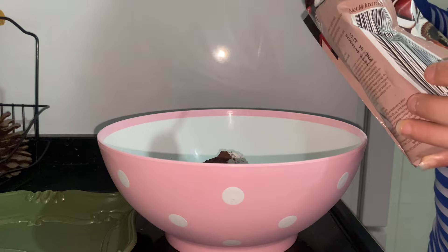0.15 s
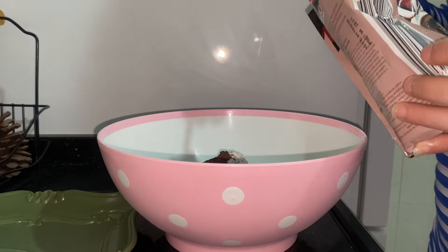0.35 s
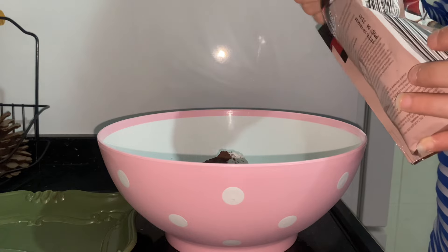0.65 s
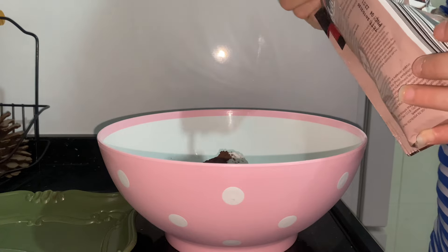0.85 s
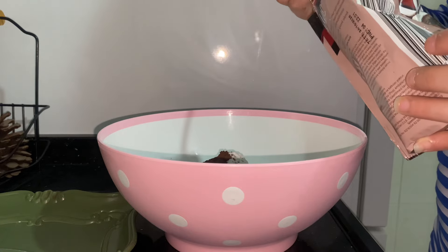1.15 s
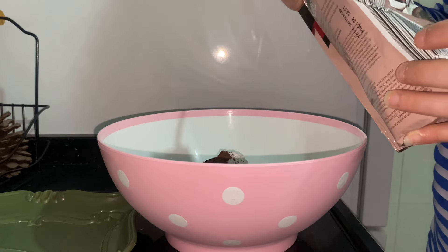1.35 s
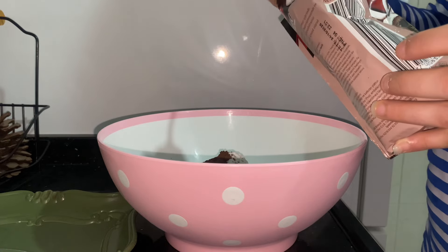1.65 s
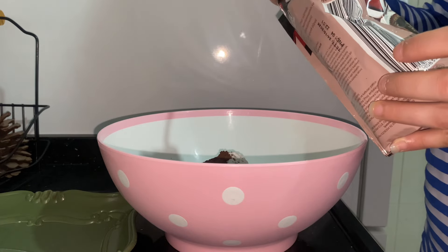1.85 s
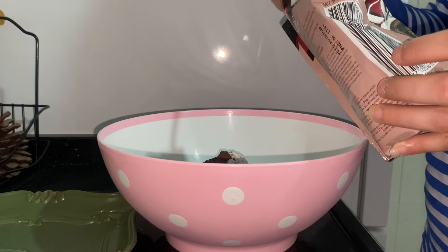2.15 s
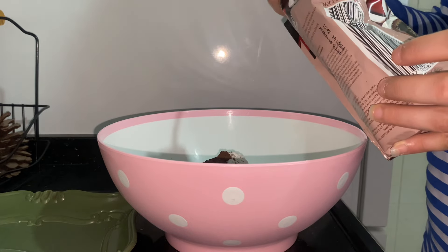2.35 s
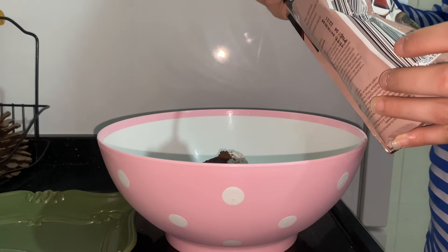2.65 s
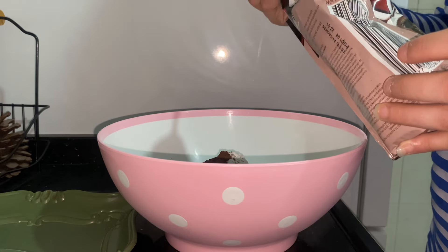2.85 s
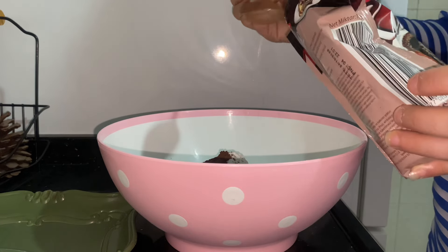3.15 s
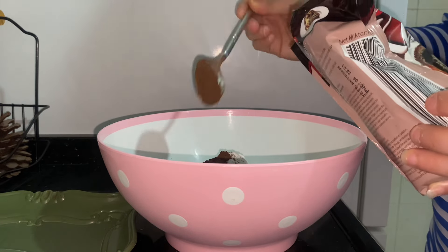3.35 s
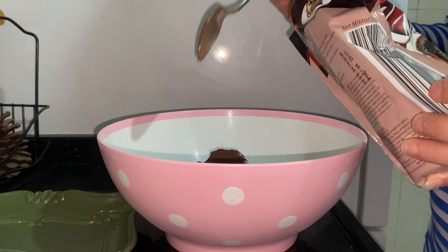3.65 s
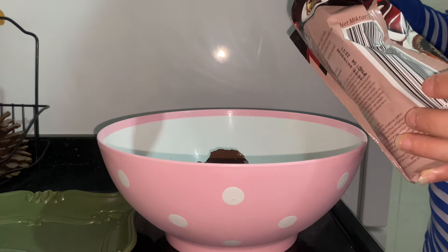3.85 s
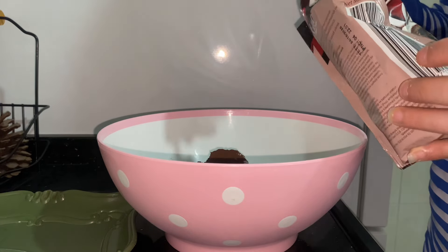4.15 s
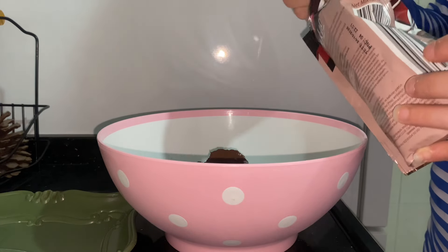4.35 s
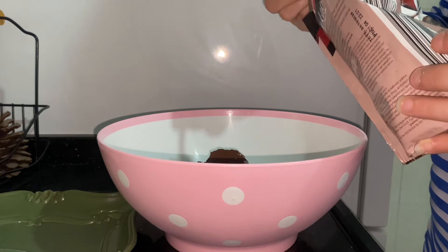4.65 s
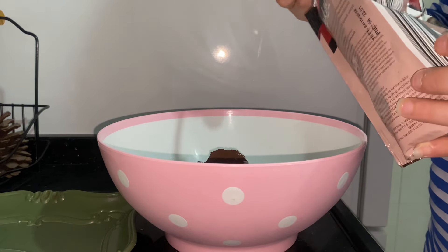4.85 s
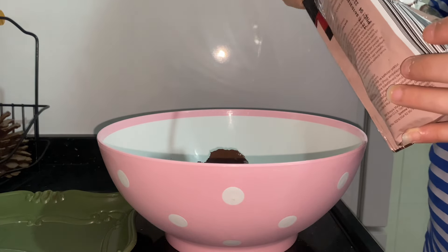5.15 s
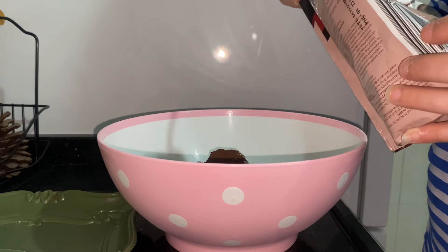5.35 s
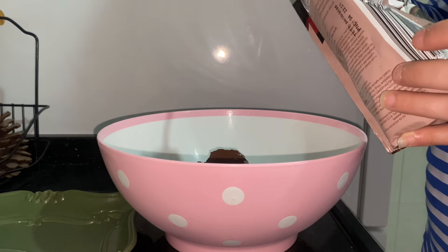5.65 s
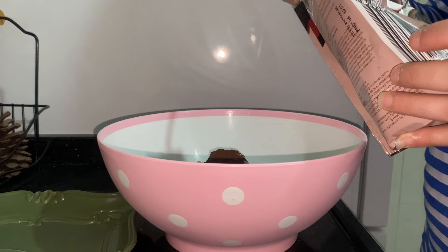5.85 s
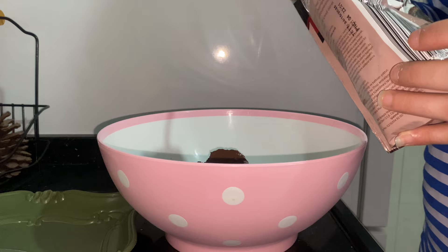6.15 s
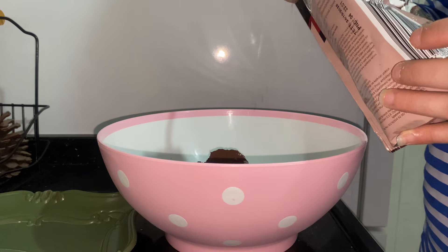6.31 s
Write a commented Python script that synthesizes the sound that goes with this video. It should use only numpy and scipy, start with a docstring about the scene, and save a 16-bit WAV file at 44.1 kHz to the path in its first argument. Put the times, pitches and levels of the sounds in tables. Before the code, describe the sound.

Close, dry crackles and gritty scrapes from a foil-lined packet, broken midway by soft low thumps of powder landing, in a quiet kitchen.

```python
"""In a quiet kitchen a deep drone and a low rumble swell and fade, with room tone and a faint hum throughout.
A spoon digs in a paper and foil packet of powder, held close over a plastic bowl: each stroke is
stick-slip friction, and the buckling packet walls snap as struck resonators, with the bowl ringing along.
Halfway through, clumps of powder land in soft thuds made of a bump and a decaying low tone, with a patter
of grains; then the digging goes on."""
import sys
import numpy as np
from scipy import signal
from scipy.fft import rfft, irfft
from scipy.io import wavfile

SR = 44100
rng = np.random.default_rng(int(sys.argv[2]) if len(sys.argv) > 2 else 0)


def to_wav(s):
    """Save 16-bit WAV."""
    ch = np.atleast_2d(s).T  # columns
    pcm = np.round(np.clip(ch, -1, 1) * 32767)  # PCM
    wavfile.write(sys.argv[1], SR, pcm.astype(np.int16))


N = 285768
TIME = np.arange(N) / SR  # s

# Level of the deep drone. Each row: time in seconds, relative level in dB.
DRONE_CURVE = [(0.0, -48.5), (0.28, -40), (0.36, -48), (1.12, -39), (1.85, -54.5), (2.91, -54), (3.3, -46),
               (4.94, -70), (6.4, -63.5)]
# Level of the low rumble. Each row: time in seconds, relative level in dB.
RUMBLE_CURVE = [(0.0, -55), (0.58, -54), (2.71, -56), (3.18, -48.5), (3.57, -55.5), (3.81, -49),
                (4.33, -55), (5.63, -61), (6.48, -59)]
# Spectrum of the low rumble. Each row: frequency in Hz, relative density in dB per Hz.
RUMBLE_SPECTRUM = [(28, -10.5), (60, -1.5), (85, 3), (130, -5.5), (190, -19.5)]
# Spectrum of the room tone. Each row: frequency in Hz, relative density in dB per Hz.
ROOM_TONE_SPECTRUM = [(100, -11.5), (200, -18), (320, -10.5), (450, -16.5), (800, -23.5), (1200, -25),
                      (1700, -33), (2400, -40), (4000, -44.5), (8000, -54.5), (11000, -51.5),
                      (16000, -69.5)]
# Times when the spoon is inside the packet. Each row: start in seconds, end in seconds.
DIG_SPANS = [(0.132, 3.054), (4.003, 5.275), (5.41, 6.48)]
# Spoon strokes. Each row: start in seconds, push in seconds, easing off in seconds,
# relative level of the scrape through the powder in dB, level of the hiss along the lining in dB.
SPOON_STROKES = [(0.132, 0.0052, 0.03, -55, -45.5), (0.163, 0.058, 0.059, -47, -46),
                 (0.294, .03, .1, -42, -47.5), (0.43, 0.039, 0.042, -50.5, -53),
                 (0.556, .18, .08, -41.5, -52), (0.79, 0.16, 0.066, -45, -54.5),
                 (1.035, 0.057, 0.072, -63, -60.5), (1.11, .073, 0.11, -56, -50),
                 (1.285, 0.065, 0.051, -53, -49), (1.439, 0.032, 0.07, -57.5, -53.5),
                 (1.54, 0.038, 0.11, -59.5, -57), (1.609, 0.039, 0.099, -56, -54.5),
                 (1.682, 0.046, .045, -53, -50), (1.779, 0.051, 0.088, -51, -47),
                 (1.87, 0.028, 0.044, -57, -50.5), (2, 0.0062, 0.059, -45, -44.5),
                 (2.025, 0.042, 0.037, -54, -49.5), (2.171, 0.014, 0.052, -46, -45),
                 (2.208, 0.031, .035, -51, -49.5), (2.322, 0.011, 0.14, -45.5, -45),
                 (2.475, 0.034, 0.047, -44, -44.5), (2.605, 0.039, 0.088, -54.5, -58),
                 (2.715, 0.055, 0.15, -46, -51), (2.91, 0.064, 0.025, -40, -46.5),
                 (4.0, 0.023, 0.025, -59, -61.5), (4.08, 0.051, 0.055, -65, -61.5),
                 (4.204, 0.0054, 0.086, -46, -50.5), (4.285, 0.057, 0.15, -48.5, -56),
                 (4.41, .053, 0.038, -37.5, -44), (4.485, 0.056, 0.37, -59, -62),
                 (4.733, 0.031, 0.042, -37.5, -50), (4.9, 0.036, 0.15, -55, -54.5),
                 (5.0, 0.11, 0.18, -52.5, -49), (5.41, .025, .035, -66, -65),
                 (5.467, 0.047, 0.056, -58, -53.5), (5.6, 0.021, 0.069, -54, -47.5),
                 (5.65, 0.045, 0.022, -54.5, -47.5), (5.775, 0.057, 0.13, -56.5, -56.5),
                 (5.955, 0.011, 0.046, -55, -47), (6.0, 0.019, 0.07, -63, -53),
                 (6.113, 0.018, 0.12, -47.5, -47), (6.282, 0.011, 0.17, -48.5, -48),
                 (6.425, 0.061, .05, -44, -46)]
# Spectrum of the scrape through powder. Each row: frequency in Hz, relative density in dB per Hz.
SCRAPE_SPECTRUM = [(200, -2.5), (300, 0), (420, 0), (560, -5.5), (700, 3), (820, -11), (950, 3), (1300, -6),
                   (1900, -3.5), (2500, -7), (3200, -6), (4300, -16), (6000, -19)]
# Spectrum of the hiss along the lining. Each row: frequency in Hz, relative density in dB per Hz.
HISS_SPECTRUM = [(900, -8.5), (1300, -5), (2000, -1), (2500, -10.5), (3200, -8), (4200, -5.5), (5200, -5),
                 (8000, -5), (9700, 3.5), (10800, 0), (12000, 0), (13500, -1.5), (14500, -13),
                 (16000, -7.5)]
# Buckles of the packet wall. Each row: time in seconds, panel pitch in Hz, panel level in dB,
# brightness of the foil's crack in dB above the panel, level of the thump of air in dB.
WALL_BUCKLES = [(0.1351, 1300, -37, -7.5, -38), (0.153, 1300, -44, -2, -47),
                (0.318, 1540, -34, -12.5, -39.5), (0.3369, 1150, -37, -1, -44),
                (0.4407, 2240, -45.5, -9, -54), (0.457, 2260, -34.5, -17, -52), (0.4732, 1470, -47, 1, -48),
                (0.6167, 1500, -47, -8, -36.5), (0.6666, 1220, -42.5, -19, -42),
                (0.7079, 1740, -39, -3.5, -41.5), (0.7319, 1000, -46, 2.5, -43),
                (0.7428, 1380, -37.5, -18, -44), (0.975, 1190, -57, -4, -37.5),
                (1.27, 1300, -39.5, -33, -36.5), (1.3761, 1770, -41.5, 2, -51),
                (1.489, 1150, -47.5, -21, -46.5), (2.004, 1192, -57, 9, -64), (2.1787, 1022, -49, 2, -49),
                (2.2321, 1240, -45.5, -3.5, -64), (2.3554, 1756, -34.5, 2.5, -55),
                (2.381, 2110, -27.5, 2.5, -64.5), (2.4322, 1240, -32, -11.5, -54),
                (2.482, 1757, -43.5, 4.5, -58), (2.5086, 1910, -29.5, 0.5, -47),
                (2.774, 1840, -35.5, -1.5, -54), (2.8527, 1760, -44, -6.5, -50),
                (2.9691, 1560, -38, -5.5, -50.5), (3.0408, 1550, -53.5, -22, -59.5),
                (4.0628, 1670, -41.5, -2.5, -39), (4.072, 1640, -42.5, -5.5, -46),
                (4.2084, 1700, -33.5, -5, -38.5), (4.2318, 1930, -25.5, -7, -35),
                (4.2323, 3290, -31.5, -13.5, -40.5), (4.3461, 1880, -35, -0.5, -47),
                (4.461, 2240, -34, -.5, -48), (4.4674, 1640, -41, -17, -40.5), (4.7553, 1580, -29, -7, -35),
                (4.7828, 1210, -30, -16, -33), (4.8086, 1880, -43.5, 3.5, -47),
                (4.9402, 1060, -49, -6.5, -67), (5.0067, 1820, -48.5, 1, -56), (5.6104, 1950, -53, 0, -45),
                (5.8237, 1200, -52, 1, -57), (5.9649, 1950, -49.5, 4, -50), (6.125, 2060, -47, 2.5, -50.5),
                (6.1521, 1900, -30.5, 2.5, -48), (6.3188, 1900, -29, 3.5, -62),
                (6.354, 1350, -29, 7, -50.5)]
# Bowl resonances set off by sound nearby. Each row: frequency in Hz, relative level in dB,
# decay time by 60 dB in seconds.
BOWL_MODES = [(650, -15.5, 0.19), (1253, -2, 0.13), (1510, -16, 0.3), (1714, -10, 0.046), (3000, -10, .1)]
# Phase by which the left port leads for sound from the packet. Each row: frequency in Hz, phase in radians.
PORT_LEAD = [(400, 0), (850, 1.7), (1800, -.4), (2400, 0), (2850, 1.7), (3900, .1), (5400, 1.8),
             (7700, -.3), (9100, -3.1), (10500, -6), (11700, -6.5), (13300, -9.4), (14600, -12.4),
             (16000, -12.7)]
# Level by which the left port exceeds the right for packet sound. Each row: frequency in Hz, excess in dB.
PORT_EXCESS = [(300, -4), (650, -1.5), (1200, 1), (2200, 3), (5000, 2.3), (11000, 0)]
# Reverberation of the kitchen. Each row: frequency in Hz, decay time by 60 dB in seconds.
KITCHEN_DECAY = [(150, .35), (1000, 0.4), (4000, 0.24), (14000, .15)]
# Loose powder pattering down around the landing clumps. Each row: start in seconds, swell in seconds,
# dying away in seconds, level in dB.
POWDER_SPILLS = [(3.157, 0.026, 0.12, -32.5), (3.34, .04, 0.089, -61.5), (3.605, 0.045, 0.08, -47),
                 (3.725, 0.021, 0.12, -46.5)]
# Clumps of powder landing. Each row: time in seconds, peak level in dB, pitch in Hz.
POWDER_CLUMPS = [(3.169, -29, 97.7), (3.194, -21.5, 79.2), (3.212, -24.5, 77.4), (3.241, -26.5, 99.2),
                 (3.308, -34, 58.7), (3.346, -36.5, 50.2), (3.636, -31, 91.2), (3.665, -32, 93.2),
                 (3.753, -33.5, 80), (3.83, -35.5, 133), (3.867, -37.5, 128)]
# Spectrum of a clump's bump. Each row: frequency in Hz, relative density in dB per Hz.
THUD_SPECTRUM = [(30, -13.5), (55, 2), (95, 2), (135, -3), (180, -22), (260, -31)]
# Spectrum of the pattering powder. Each row: frequency in Hz, relative density in dB per Hz.
PATTER_SPECTRUM = [(140, 1.5), (190, -16), (240, -5), (300, 2.5), (345, -2), (410, -3.5), (480, -3),
                   (560, -30), (700, -20), (850, -33), (1350, -32), (2500, -55.5)]


def from_db(db):
    """Decibel law: a level difference as an amplitude ratio."""
    return 10 ** (np.asarray(db) / 20)


def rms_one(x):
    """Normalisation of effective value: scaled to rms 1."""
    return x / np.sqrt(np.mean(x ** 2) + 1e-20)


def at_hz(points, hz):
    """Interpolation of a table on a logarithmic frequency axis."""
    table_hz, value = np.transpose(points)
    return np.interp(np.log(np.maximum(hz, 1)), np.log(table_hz), value)


def band(x, low_hz, high_hz, order=2):
    """Causal band-pass filtering with a maximally flat passband."""
    edges_hz = [low_hz, min(high_hz, .45 * SR)]
    return signal.sosfilt(signal.butter(order, edges_hz, "band", fs=SR, output="sos"), x + 1e-18)


def colour(x, spectrum, size=8192):
    """Minimum-phase filtering, by the folded cepstrum, to a spectrum with steep skirts; rms 1."""
    hz = np.maximum(np.fft.rfftfreq(size, 1 / SR), 1)
    low_skirt = 1 + (spectrum[0][0] / hz / 1.2) ** 6
    high_skirt = 1 + (hz / spectrum[-1][0] / 1.2) ** 6
    gain = from_db(at_hz(spectrum, hz)) / np.sqrt(low_skirt * high_skirt)
    cepstrum = irfft(np.log(gain + 1e-6))
    cepstrum[size // 2:] = 0
    response = irfft(np.exp(rfft(2 * cepstrum)))
    return rms_one(signal.fftconvolve(np.atleast_2d(x), response[None])[:, :N])


def drift(rate):
    """Slow random modulation: chance values of spread 1, `rate` per second, joined by straight lines."""
    knots = rng.standard_normal(N // 20)
    return np.interp(TIME * rate, np.arange(len(knots)), knots)


def resonance(x, hz, width_hz):
    """Damped oscillation: a two-pole resonator with gain 1 at its peak."""
    r = np.exp(-np.pi * width_hz / SR)
    zeros = np.array([1, 0, -1]) * (1 - r * r) / 2
    poles = [1, -2 * r * np.cos(2 * np.pi * hz / SR), r * r]
    return signal.lfilter(zeros, poles, x + 1e-18)


def wide_noise(side_db):
    """Partial coherence: stereo white noise with a part of opposite sign in the two channels."""
    mid, side = rng.standard_normal((2, N))
    return mid + from_db(side_db) * side * [[1], [-1]]


def level(rows):
    """Amplitude envelope: a curve of time and dB as a gain."""
    return from_db(np.interp(TIME, *np.transpose(rows)))


def wavering_tone(hz, phase_waver, phase_rate, level_waver_db, level_rate):
    """Phase and amplitude modulation: a sine whose phase and level drift; rms 1."""
    tone = np.sin(2 * np.pi * hz * TIME + phase_waver * drift(phase_rate))
    return rms_one(tone * from_db(level_waver_db * drift(level_rate)))


def background(drone_db=1.5, rumble_db=4.0, room_tone_db=-60.5, hum_db=-67, pan_db=-0.34):
    """Superposition: a deep drone and low rumble that swell and fade, room tone, wavering appliance hum."""
    drone = level(DRONE_CURVE) * from_db(drone_db) * wavering_tone(46.1, 0.97, 9.9, 2.2, 24)
    rumble_noise = colour(wide_noise(side_db=-16.5), RUMBLE_SPECTRUM)
    rumble = level(RUMBLE_CURVE) * from_db(rumble_db) * rumble_noise
    room_tone = from_db(room_tone_db) * colour(wide_noise(side_db=1.5), ROOM_TONE_SPECTRUM)
    hum = from_db(hum_db) * wavering_tone(296.3, 0.8, 7.7, 1.3, 9)
    return (drone + rumble + room_tone + hum) * from_db([[pan_db], [-pan_db]])


def swell(start_s, rise_s, fall_s, depth_db=19.5, roundness=1.46):
    """Envelope of one gesture: the gain builds up to 1 and eases off along a rounded slope in dB."""
    late = TIME - start_s - rise_s
    away = np.clip(np.maximum(-late / rise_s, late / fall_s), 0, 5)
    return from_db(-depth_db * away ** roundness)


def pressure(rub_scrape_db=-64, rub_hiss_db=-73.5, uneven_db=2.0, withdraw_db_per_s=142):
    """Friction grows with contact force: light uneven rubbing on powder and lining, strokes on top."""
    inside = sum((TIME > start) * from_db(-withdraw_db_per_s * np.maximum(TIME - end, 0))
                 for start, end in DIG_SPANS)
    rub = from_db(uneven_db * drift(14))
    scrape, hiss = from_db(rub_scrape_db) * rub, from_db(rub_hiss_db) * rub
    for start_s, push_s, ease_s, scrape_db, hiss_db in SPOON_STROKES:
        push = swell(start_s, push_s, ease_s)
        scrape = np.maximum(scrape, from_db(scrape_db) * push)
        hiss = np.maximum(hiss, from_db(hiss_db) * push)
    return inside * scrape, inside * hiss


def slips(per_s, spread_db, clump_db):
    """Stick-slip friction: tiny clicks of uneven size and either sign that come in clumps."""
    sizes = from_db(spread_db * np.minimum(rng.exponential(1, N), 4)) * rng.choice([-1, 1], N)
    happens = rng.random(N) < per_s / SR
    return sizes * happens * from_db(clump_db * drift(170))


def crinkles(per_s=24, sharpness=6.0, patchy_db=4.5, count=18):
    """Impulsive excitation of small paper facets: each ticks at its own pitch, busy for a while at a time."""
    facets = 0
    for hz in np.geomspace(550, 5600, count):
        ticks = resonance(slips(per_s, spread_db=3.5, clump_db=4.5), hz, hz / sharpness)
        facets = facets + ticks * from_db(patchy_db * drift(11))
    return rms_one(facets)


def strokes(scrape_db=-5.5, crinkle_db=-5.0, foil_tick_db=-12.0, sheen_db=-2.0):
    """Sliding friction: the spoon grinds through powder, crinkles the paper and slides over the foil."""
    scrape, hiss = pressure()
    grinding = colour(slips(per_s=2400, spread_db=1.5, clump_db=1.0), SCRAPE_SPECTRUM)[0]
    ticking = colour(crinkles(), SCRAPE_SPECTRUM)[0]
    foil_ticks = from_db(foil_tick_db) * rms_one(slips(per_s=120, spread_db=3.0, clump_db=3.0))
    foil_slips = rms_one(slips(per_s=12000, spread_db=1.0, clump_db=2.95))
    sliding = colour(foil_slips + foil_ticks, HISS_SPECTRUM)[0]
    # the lining's bright resonance comes and goes as the foil is stretched
    sheen = from_db(sheen_db + 4.5 * drift(13)) * resonance(sliding, hz=3500, width_hz=1100)
    powder_and_paper = from_db(scrape_db) * grinding + from_db(crinkle_db) * ticking
    return scrape * powder_and_paper + hiss * rms_one(sliding + sheen)


def buckle(t, strength_db, rise_s=.0002, firm_db=-28, softness=.65, follow_s=0.001, follow_db=-17, count=6):
    """Snap-through instability: one crease flips, neighbours follow; weak flips are slower and more ragged."""
    slack = np.clip(from_db(softness * (firm_db - strength_db)), 1, 4)
    kicks = np.eye(1, len(t))[0]
    delays = np.cumsum(rng.exponential(follow_s * slack, count))
    sizes = rng.standard_normal(count) * from_db(follow_db) * slack * np.linspace(1, .3, count)
    kicks[np.minimum(delays * SR + 8, len(t) - 1).astype(int)] = sizes
    burst = rng.standard_normal(len(t)) * t * np.exp(-t / (rise_s * slack))
    crackle = signal.fftconvolve(kicks, burst / np.linalg.norm(burst))[:len(t)]
    # the bursts take time to build up, so the kicks are held back too
    return np.roll(kicks, round(2 * rise_s * SR)), crackle


def snaps(fizz_db=-4.5, fizz_per_brightness=1.53, edge_db=-9, top_db=-6, knock_db=-2.5,
          knock_db_per_octave=14, thump_s=0.011, size=3072):
    """Impulse response of a panel: the foil cracks, the panel rings and pushes out air with a hollow knock."""
    out, t = np.zeros(N + size), np.arange(size) / SR
    for s, hz, panel_db, bright_db, thump_db in WALL_BUCKLES:
        crack_db = panel_db + bright_db
        # the finest fizz gains faster than the crack as a buckle gets brighter
        fine_db = panel_db + fizz_db + fizz_per_brightness * bright_db
        kicks, crackle = buckle(t, max(crack_db, fine_db))
        air = rng.standard_normal(size) * np.exp(-t / thump_s)
        # wide, low panels knock most
        hollow = from_db(knock_db - knock_db_per_octave * np.log2(hz / 1400))
        thump = band(air, 63, 400) - hollow * resonance(air, hz=700, width_hz=140)
        flex = resonance(kicks, hz, width_hz=380) + from_db(edge_db) * band(kicks, 870, 2700, order=3)
        # panels share an overtone near 3050 Hz, varied by up to 1 %; panels above about 1930 Hz ring higher
        upper_hz = max(1.58 * hz, 3050) * rng.uniform(1.0, 1.01)
        crack = band(0.26 * kicks + crackle, 2500, 5730, order=3) + resonance(kicks, upper_hz, width_hz=600)
        bright = .5 * kicks + crackle
        top = rms_one(band(bright, 11000, 12600, order=3))
        fizz = rms_one(band(bright, 5260, 7870, order=3)) + from_db(top_db) * top
        start = round(s * SR)
        for part, level_db in [(thump, thump_db), (flex, panel_db), (crack, crack_db), (fizz, fine_db)]:
            # the level is the rms this part would have if its energy filled 5 ms
            equal_energy = part / np.linalg.norm(part) * np.sqrt(.005 * SR)
            out[start:start + size] += from_db(level_db) * equal_energy
    return out[:N]


def inside_packet(x, echo_db=-14.0, t60=0.018, bends_per_s=9, hollow_share=0.6, size=4096, count=5):
    """Multiple reflection between bending walls, with a cavity that swallows one band."""
    t = np.arange(size) / SR
    noise = rng.standard_normal((count, size)) * from_db(-60 * t / t60)
    echoes = band(noise * (t > .0008), 780, 9000, order=1)
    echoes = echoes / np.linalg.norm(echoes, axis=1, keepdims=True)
    # drifting shares of fixed echo patterns stand for the changing shape
    shapes = np.array([drift(bends_per_s) for _ in range(count)])
    shares = shapes / np.linalg.norm(shapes, axis=0)
    bounced = signal.fftconvolve(x * shares, echoes, axes=1).sum(axis=0)[:N]
    x = x + from_db(echo_db) * bounced
    return x - hollow_share * resonance(x, hz=2520, width_hz=480)


def bowl(x, ring_db=4.0):
    """Sympathetic resonance: the bowl's modes ring along faintly, each as wide as its damping."""
    return sum(from_db(level_db + ring_db) * resonance(x, hz, np.log(1000) / np.pi / t60)
               for hz, level_db, t60 in BOWL_MODES)


def ports(x):
    """Phase and level differences: packet sound meets two microphone ports with unlike phase and strength."""
    spectrum, hz = rfft(x, 2 * N), np.fft.rfftfreq(2 * N, 1 / SR)
    # half of each difference goes to either port
    turn = np.exp(.5j * at_hz(PORT_LEAD, hz)) * from_db(.5 * at_hz(PORT_EXCESS, hz))
    return irfft([spectrum * turn, spectrum / turn])[:, :N]


def surroundings(x, near_db=-7.0, near_t60=0.03, room_db=-11, dull_hz=7000, size=22050):
    """Early reflection and reverberation: quick returns from bowl and wall, then the kitchen's short tail."""
    t, response = np.arange(size) / SR, 0
    white = rng.standard_normal((2, 2, size))  # neighbouring bands take turns between two stereo noises
    edges = np.geomspace(100, 17000, 9)
    near = from_db(-60 * t / near_t60)
    for k, (low, high) in enumerate(zip(edges, edges[1:])):
        far = from_db(-60 * t / at_hz(KITCHEN_DECAY, np.sqrt(low * high)))
        early = from_db(near_db) * near / np.linalg.norm(near)
        late = from_db(room_db) * far / np.linalg.norm(far) * (1 - near)
        response = response + band(white[k % 2] * (early + late) * (t > .0008), low, high)
    return signal.fftconvolve(x[None], band(response, 80, dull_hz, order=3))[:, :N]


def falling_powder(ring_share=0.53, ring_s=0.02, size=6000):
    """Soft impact and granular flow: clumps land with a bump and short low ring; loose powder patters."""
    t, thuds = np.arange(size) / SR, np.zeros(N)
    bump = colour(np.eye(1, size), THUD_SPECTRUM)[0, :size]
    bump = bump / np.abs(bump).max()
    for s, level_db, hz in POWDER_CLUMPS:
        ring = np.sin(2 * np.pi * hz * t) * t / ring_s * np.exp(1 - t / ring_s)
        thud = bump + ring_share * ring
        start = round(s * SR)
        thuds[start:start + size] += from_db(level_db) * thud / np.abs(thud).max()
    grains = rms_one(slips(per_s=900, spread_db=1.5, clump_db=-1.0))
    patter = colour(grains + 1.14 * rng.standard_normal((2, N)), PATTER_SPECTRUM)
    flow = sum(from_db(db) * swell(s, rise_s, fall_s) for s, rise_s, fall_s, db in POWDER_SPILLS)
    return thuds + flow * patter


def scene(bowl_pan_db=-1.0):
    """Superposition: the packet close by, the bowl below it, the kitchen around."""
    packet = inside_packet(snaps() + strokes())
    powder = falling_powder() * from_db([[bowl_pan_db], [-bowl_pan_db]])
    return ports(packet + bowl(packet)) + surroundings(packet) + powder + background()


def record(dry, left_bass_hz=27, cutoff_hz=15900):
    """Band limitation: the left microphone loses its deepest bass; the top of both is cut steeply."""
    left = signal.sosfilt(signal.butter(1, left_bass_hz, "high", fs=SR, output="sos"), dry[0])
    steep = signal.ellip(10, .2, 80, cutoff_hz, fs=SR, output="sos")
    return signal.sosfilt(steep, np.array([left, dry[1]]))


dry = scene()
out = record(dry)
to_wav(out)
```